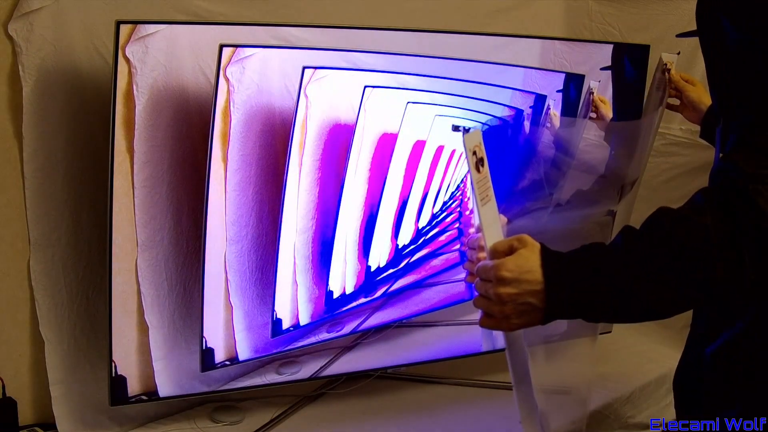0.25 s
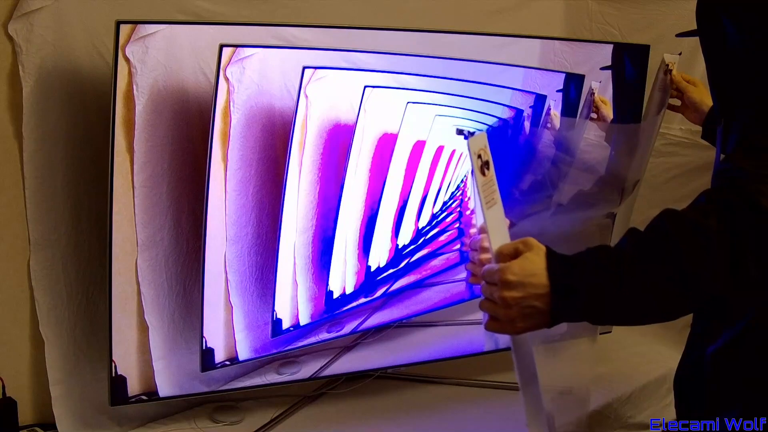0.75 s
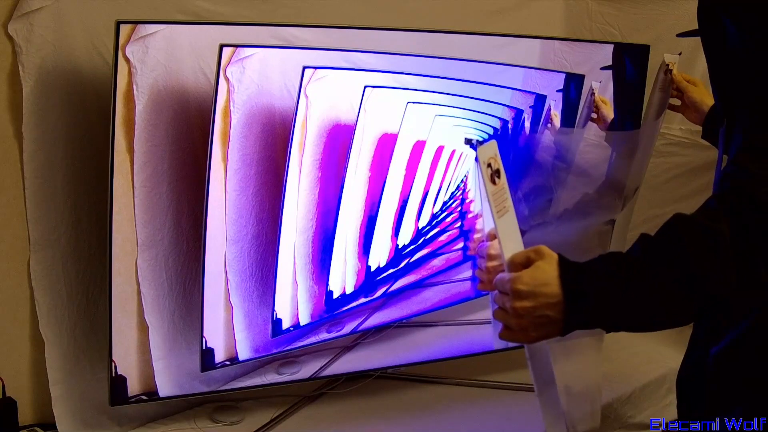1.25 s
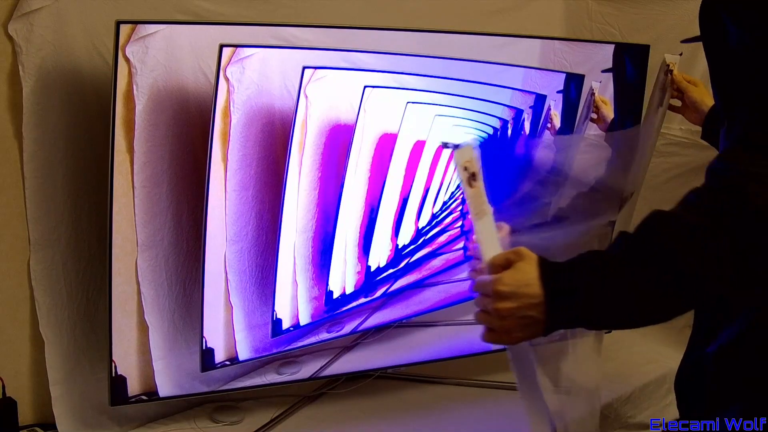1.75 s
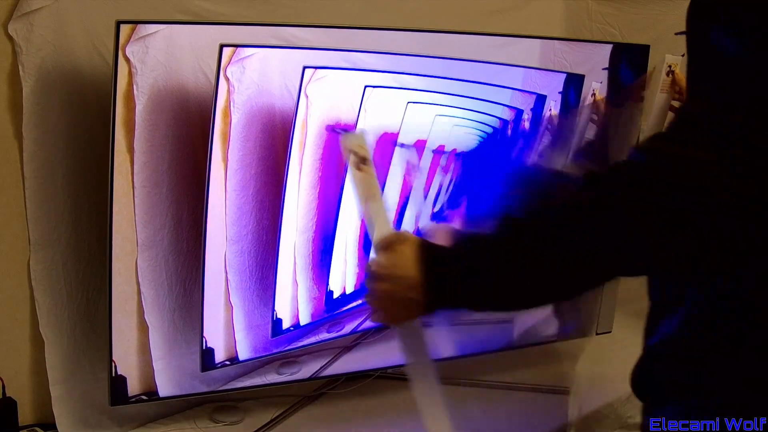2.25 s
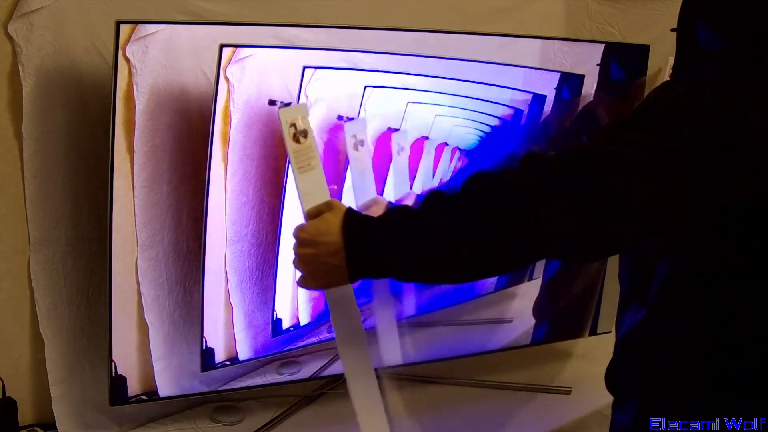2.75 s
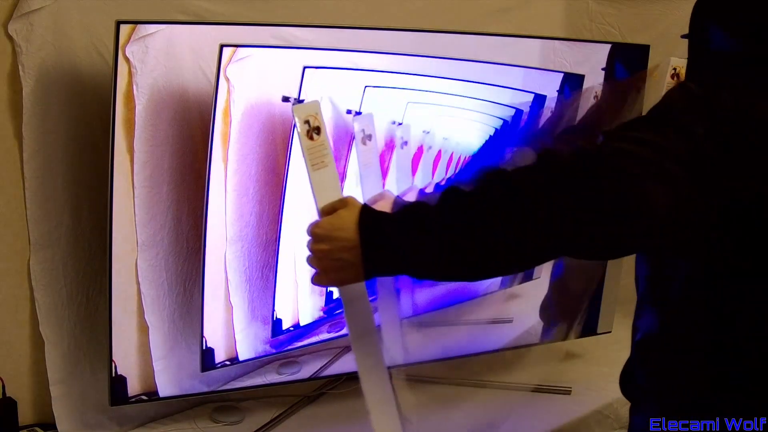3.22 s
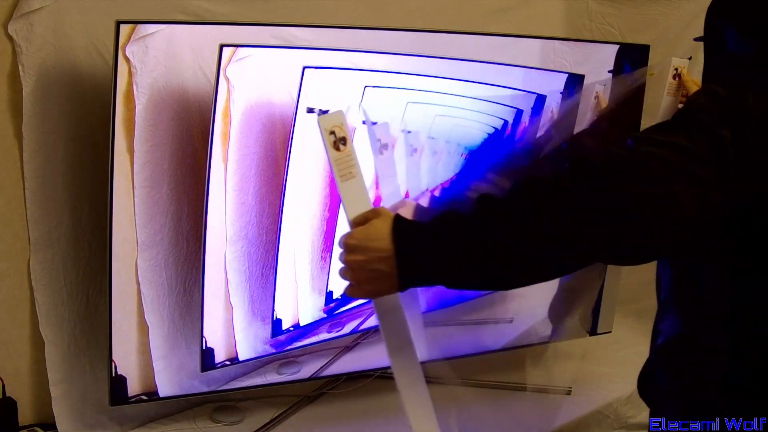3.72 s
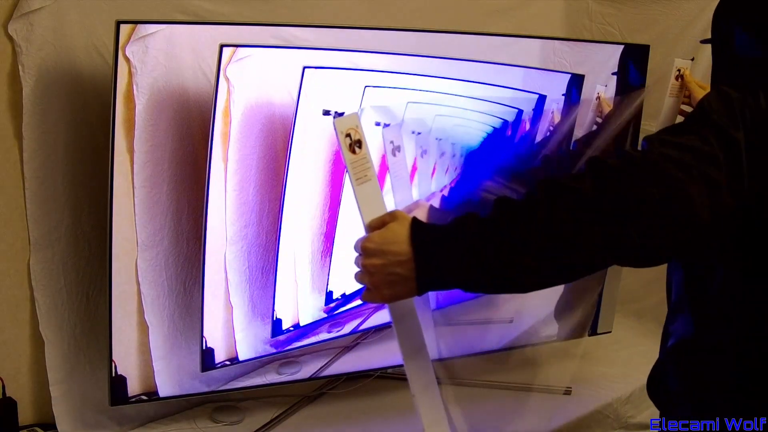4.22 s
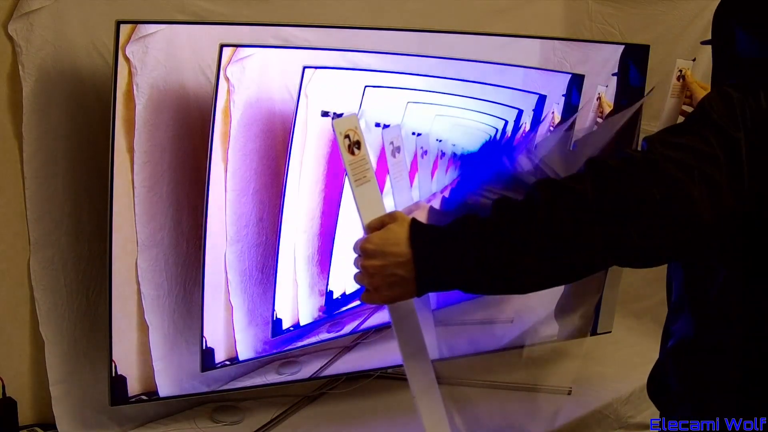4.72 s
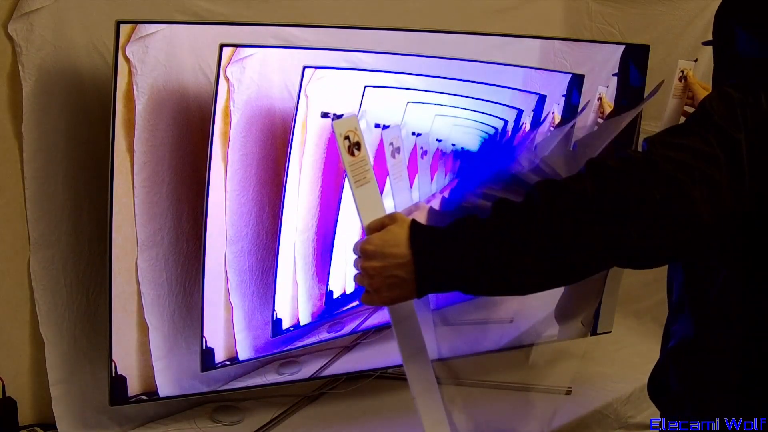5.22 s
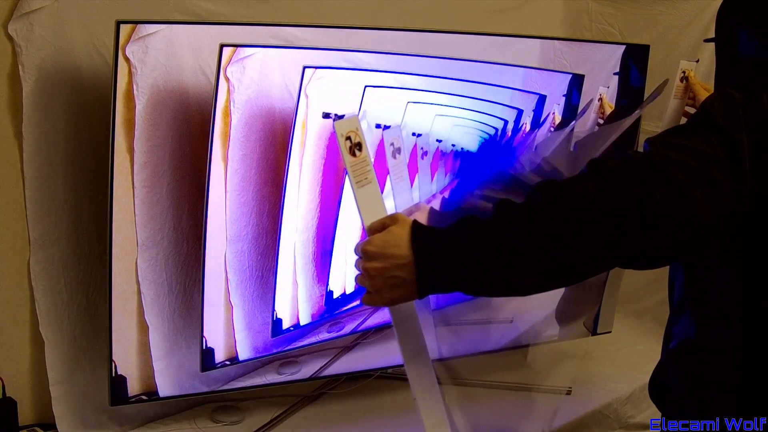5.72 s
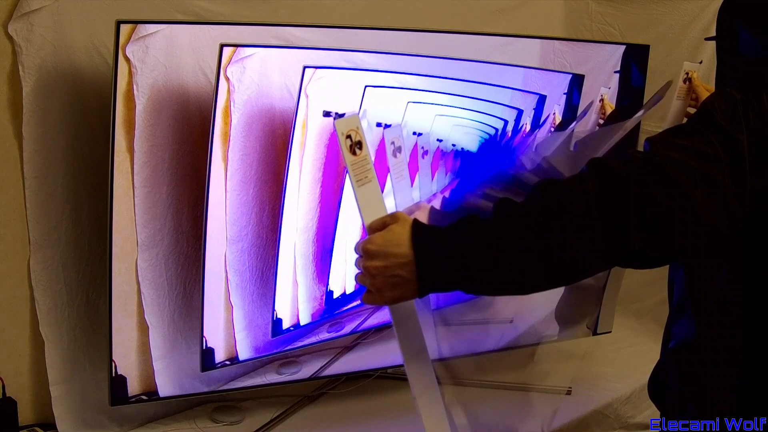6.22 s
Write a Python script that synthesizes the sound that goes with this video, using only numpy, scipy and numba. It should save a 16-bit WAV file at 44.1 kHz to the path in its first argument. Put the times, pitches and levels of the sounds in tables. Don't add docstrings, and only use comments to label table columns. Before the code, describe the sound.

Close recording in a small furnished room. Thin plastic film on a large screen gives a few faint ticks and crisp single snaps, then a hard crack starts a dense rustling, crackling peel with quick rows of clicks and low knocks of the stand. It eases into isolated sharp cracks. Quiet fan noise and mains hum jump up with each snap and slide back down.

```python
import sys
import numpy as np
from scipy import signal
from scipy.fft import rfft, irfft
from scipy.io import wavfile
from scipy.ndimage import uniform_filter1d
from numba import njit

SR = 44100
rng = np.random.default_rng(int(sys.argv[2]) if len(sys.argv) > 2 else 0)


def to_wav(sig):
    pcm = np.clip(np.atleast_2d(sig), -1, 1) * 32767
    pcm = np.round(pcm).astype(np.int16)
    wavfile.write(sys.argv[1], SR, pcm.T)


def elevation(decibels):
    levels = np.asarray(decibels, float)
    return 10 ** (levels / 20)


N = 285092

# freq_hz, density_db_per_hz
AIR_SPECTRUM = [(41, -39.5), (70, -13.5), (108, -9.5), (177, -7), (239, -2.5), (337, -8.5), (418, -1.5),
                (507, -7.5), (797, -11), (1010, -17.5), (1620, -20), (2190, -23.5), (4650, -32.5),
                (12000, -63), (15600, -80.5), (22000, -120)]
# freq_hz, level_db
HUM_TONES = [(49.8, -77), (100, -80), (246, -83.5), (432, -84.5), (786, -78.5), (4715, -101)]
# band_hz, t60_s
ROOM_T60 = [(200, 0.37), (400, 0.43), (800, 0.32), (1600, 0.23), (3200, 0.21), (6400, 0.15), (12000, 0.2)]
# start_s, peak_db, ring_hz, treble_db
TICKS = [
    (0.458, -54, 1240, -22),
    (0.5008, -53.5, 1470, -23),
    (0.7732, -53.5, 2060, 9),
    (1.2595, -53, 1580, -32),
    (1.5638, -57.5, 1198, -25),
    (5.6504, -66, 1450, 5.5),
    (5.6564, -70, 1420, 8),
]
# start_s, peak_db, ring_hz, bright_click_db, slackness_db
LONE_CREASES = [(0.6323, -30, 1010, -60, 2.5), (0.8025, -21, 1480, -29, 2), (1.0207, -28, 800, -52, -6),
                (1.06, -36.5, 1510, -65, -12), (1.6363, -28, 1447, -53, 1), (1.6784, -4.5, 1860, -14.5, -1),
                (1.6951, -19.5, 1680, -18, 5.5), (1.7077, -13, 970, -19, 3.5), (1.7644, -24, 2970, -61, -6),
                (1.7724, -25, 880, -49, 6.5), (4.359, -20.5, 1635, -46.5, 0.5),
                (4.5176, -29.5, 1687, -32, -4), (4.554, -2, 1704, -13, -2.5),
                (4.5614, -11, 1600, -35.5, -6), (4.5844, -24, 2260, -54.5, -13.5),
                (5.0522, -15.5, 1380, -22, -20), (5.0586, -21.5, 3550, -20, -2.5),
                (5.0677, -24.5, 3420, -43, -4), (5.0913, -24.5, 1370, -27.5, -20),
                (5.1027, -27, 3000, -37.5, -7.5), (5.7508, -29, 1520, -39, -6.5),
                (6.1714, -32.5, 1440, -30, -7.5), (6.1811, -22, 1460, -19, -3.5),
                (6.2418, -33.5, 1306, -33, -19.5)]
# start_s, peak_db, ring_hz, bright_click_db
PULLED_CREASES = [(1.906, -14, 1040, -25), (2.107, -28.5, 1190, -45), (2.2137, -22.5, 1370, -48),
                  (2.2686, -33, 940, -59.5), (2.3561, -24, 1190, -41), (2.534, -19, 980, -50),
                  (2.6516, -17, 840, -47), (2.7185, -37, 1260, -36), (2.827, -19.5, 1840, -54),
                  (2.8677, -14.5, 1520, -23), (2.8894, -21, 2160, -48), (2.9099, -8.5, 1660, -15),
                  (3.0116, -7, 1670, -16), (3.021, -11, 2480, -22.5), (3.127, -11.5, 2880, -33.5),
                  (3.1358, -14.5, 1620, -47), (3.1681, -14.5, 1170, -56), (3.2056, -20.5, 1900, -29),
                  (3.2344, -17.5, 2170, -27), (3.3262, -11.5, 1850, -33.5), (3.484, -15.5, 1320, -57),
                  (3.6262, -29, 2040, -52), (3.6603, -24, 1490, -55), (3.735, -22.5, 1320, -56),
                  (3.8998, -25.5, 1140, -43), (3.915, -13, 2150, -30), (4.0007, -21.5, 1130, -34.5),
                  (4.1252, -19.5, 1400, -55), (4.1975, -32, 1890, -43)]
# crease_column_index, low_hz, high_hz, level_re_column_db, decay_s
SETTLING = [
    (1, 730, 2400, -26, 0.015),
    (3, 2000, 7000, -25, 0.017),
]
# start_s, peak_db, length_ms, top_edge_db
ZIPS = [(0.84, -26.5, 12, -9), (1.7074, -16, 30, -24), (2.13, -39, 1, -37), (2.289, -31.5, 1, -32),
        (2.485, -23.5, 14, -22), (2.7163, -20.5, 16, -23), (3.1174, -35, 1, -30), (3.2467, -30.5, 12, -23),
        (3.344, -29, 11, -24), (3.4947, -22, 16, -19), (3.5782, -29.5, 16, -18), (3.707, -45, 1, -35),
        (3.762, -43, 1, -17), (3.784, -31, 1, -37), (4.0527, -36, 1, -33), (5.755, -34.5, 1, -10),
        (6.1744, -27, 6, -18), (6.1894, -25, 1, -21.5)]
# time_s, pull_db, tautness_db
PEEL_FRONT = [(1.76, -30, 17), (1.82, -36, -8), (1.89, -43, 0), (2.01, -35, -5), (2.18, -34.5, -1.5),
              (2.5, -35, 12.5), (2.68, -36.5, 2), (2.82, -42, 1), (2.9, -36, 10.5), (3.06, -40.5, 23),
              (3.11, -38.5, 19), (3.35, -39.5, 5), (3.6, -36.5, 2), (3.74, -34.5, 3), (3.83, -40.5, 5),
              (4.06, -40, 6), (4.21, -42.5, -17), (4.42, -44.5, 10)]
# freq_hz, width_hz, level_db
SHEET_MODES = [(333, 220, -4), (607, 95, 0), (713, 130, 2.5), (990, 1800, -4.5)]
# crest_s, level_db, length_ms
RUSHES = [(2.059, -35, 58), (2.11, -35.5, 44), (2.277, -36.5, 33), (2.48, -35, 41), (2.542, -37.5, 42),
          (2.585, -30.5, 32), (2.656, -37.5, 25), (2.961, -32.5, 22), (3.138, -26.5, 33), (3.221, -32, 62),
          (3.64, -51, 27), (3.701, -37, 29), (3.75, -43, 110), (4.212, -40, 44)]
RUSH_BAND_HZ = 810, 2593
# start_s, boom_db, boom_hz, t60_s, knock_db
THUDS = [
    (2.108, -40.5, 38.34, 0.5, -31),
    (2.2, -47, 52.3, 0.33, -44),
    (3.278, -51, 75, .3, -49.5),
    (3.779, -56, 78.6, 0.14, -45),
]

AIR_DB, ROOM_DB = -64, -8.5
GATE_DB, OPEN_DB, KNEE_DB, SHUT_S = 19.5, -41.5, 5, 0.13
BURST_MS, BURST_SPREAD, CLICK_LEAD_S = 7.87, 0.16, 0.0013
BODY_DB, BODY_SLOPE = -14.5, 0.67
TREBLE_DB, LONE_EDGE_DB, PULLED_EDGE_DB = -12.5, -15.5, -35
WRINKLE_HZ, WRINKLE_SPREAD, WRINKLE_MS = 4430, 0.1272, 2.76
ZIP_GAP_MS, ZIP_FADE_DB, ZIP_SCATTER_DB = 6.3, 0.5, 4.5
CRINKLE_DB, FINE_DB = -6, -25
CRINKLE_TAUT = 0.52
PRICKLE_PER_S, PRICKLE_DB = 90, -11.5


def soft(x, hz):
    return signal.sosfilt(signal.butter(2, hz, fs=SR, output="sos"), x)


def band(x, hz, width_hz):
    r = np.exp(-np.pi * width_hz / SR)
    angle = 2 * np.pi * min(hz, 0.4 * SR) / SR
    return signal.lfilter([1, -1], [1, -2 * r * np.cos(angle), r * r], x)


def passband(x, lo_hz, hi_hz):
    edges_hz = [lo_hz, min(hi_hz, 0.45 * SR)]
    return signal.sosfilt(signal.butter(2, edges_hz, "band", fs=SR, output="sos"), x)


def unit(x):
    return x / np.sqrt(np.mean(x ** 2))


def peak(x, db):
    return x * elevation(db) / np.max(np.abs(x))


def add(out, start_s, x):
    i = int(start_s * SR)
    out[i:i + len(x)] += x[:len(out) - i]


def grains(rate_per_s, spread_db):
    hit, size, sign = rng.random((3, N))
    height = elevation(-spread_db * np.log(size + 1e-4))
    return unit((hit < rate_per_s / SR) * np.sign(sign - 0.5) * height)


def air():
    hz, db = np.transpose(AIR_SPECTRUM)
    f = np.maximum(np.arange(N // 2 + 1) * SR / N, 1)
    shape = elevation(np.interp(np.log(f), np.log(hz), db))
    noise = unit(irfft(rfft(rng.standard_normal(N)) * shape, N))
    t = np.arange(N) / SR
    wander = np.cumsum(rng.standard_normal((len(HUM_TONES), N)), axis=1)
    phase = wander * 0.004 * np.sqrt(np.array(HUM_TONES)[:, :1] / 50)
    hum = sum(elevation(d) * np.sqrt(2) * np.sin(2 * np.pi * h * t + p) for (h, d), p in zip(HUM_TONES, phase))
    return (noise * elevation(AIR_DB - 0.5) + hum) * elevation(GATE_DB)


def room(x):
    t = np.arange(SR // 2) / SR
    tail = np.zeros(len(t))
    for noise, (hz, t60_s) in zip(rng.standard_normal((len(ROOM_T60), len(t))), ROOM_T60):
        tail += passband(noise, hz / 1.272, hz * 1.506) * 1000. ** (-t / t60_s)
    tail *= 1 - np.exp(-t / 0.0039)
    return x + elevation(ROOM_DB) * signal.fftconvolve(x, tail / np.sqrt(np.sum(tail ** 2)))[:N]


def volley(chance, rise_ms, length_ms):
    t_ms = np.arange(chance.shape[1]) / SR * 1000
    slips = (chance[0] < 0.15) * (chance[1] - 0.5) + 0.16 * (chance[2] - 0.5)
    slips[int(1.5 * rise_ms * SR / 1000)] = 0.79
    return slips * (1 - np.exp(-t_ms / rise_ms)) * np.exp(-(t_ms / max(length_ms, 0.5)) ** 1.8)


def snap(db, hz, treble_db, body_db, length_ms, chance):
    ring = band(volley(chance, 1.0, length_ms), hz, 0.38 * hz)
    ring = soft(band(ring, 0.6 * hz, 3.35 * hz), 2.52 * hz)
    ring = soft(ring, 5100)
    treble = soft(passband(volley(chance, 0.46, 0.34 * length_ms), 3300, 5100), 12000)
    body = soft(passband(volley(chance, 2.6, 1.4 * length_ms), 362, 1000), 1716)
    return peak(ring, db - 2.5) + peak(treble, db + treble_db - 11.5) + peak(body, db + body_db + 0.55)


def ticks():
    out = np.zeros(N)
    for (s, db, hz, treble_db), chance in zip(TICKS, rng.random((len(TICKS), 3, 2048))):
        add(out, s - 0.001, snap(db + GATE_DB - 0.5, hz, treble_db, -19, 12.0, chance))
    return out


def wrinkle(db, hz, edge_db, length_ms, chance):
    click = passband(volley(chance, 0.4, length_ms), 0.27 * hz, 1.297 * hz)
    click = soft(soft(click, 9800), 9800)
    edge = soft(passband(volley(chance[::-1], 0.2, 0.86 * length_ms), 7500, 15000), 14000)
    return peak(click, db + 1.5) + peak(edge, db + edge_db - 2.0)


def fold(db, edge_db, chance):
    hz = WRINKLE_HZ * (1 + WRINKLE_SPREAD * (2 * chance[2, -1] - 1))
    return wrinkle(db, hz, edge_db, WRINKLE_MS, chance)


def creases(table, edge_db):
    out = np.zeros(N)
    for (s, db, hz, bright_db, *slack_db), chance in zip(table, rng.random((len(table), 6, 1200))):
        length_ms = BURST_MS * (1 + BURST_SPREAD * (2 * chance[5, -1] - 1))
        body_db = BODY_DB + (BODY_SLOPE - 1) * db + sum(slack_db)
        add(out, s - 0.001, snap(db, hz, bright_db + TREBLE_DB - db, body_db, length_ms, chance[:3]))
        add(out, s - CLICK_LEAD_S, fold(bright_db, edge_db, chance[3:, :800]))
    return out


def settling():
    rows = np.array([row[:4] for row in (*LONE_CREASES, *PULLED_CREASES)])
    out = np.zeros(N)
    for column, lo_hz, hi_hz, db, decay_s in SETTLING:
        kick = np.zeros(N)
        kick[(rows[:, 0] * SR).astype(int) + 88] = elevation(rows[:, int(column)] + db)
        fade = signal.lfilter([1], [1, -np.exp(-1 / (decay_s * SR))], kick)
        crackle = passband(grains(5000, 2.5), lo_hz, hi_hz)
        out += fade * unit(soft(soft(crackle, 1.5 * hi_hz), 1.6 * hi_hz))
    return out


def zips():
    out = np.zeros(N)
    for (s, db, length_ms, edge_db), row in zip(ZIPS, rng.random((len(ZIPS), 5, 3, 800))):
        clicks = 1 + int(length_ms / ZIP_GAP_MS + 0.5)
        for k, chance in enumerate(row[:clicks]):
            late_s = k * ZIP_GAP_MS / 1000 * (0.7 + 0.45 * chance[0, -1])
            click_db = db - k * ZIP_FADE_DB - ZIP_SCATTER_DB * chance[1, -1]
            add(out, s + late_s - 0.0005, fold(click_db, edge_db, chance))
    return out


def snaps():
    loud = creases(LONE_CREASES, LONE_EDGE_DB) + creases(PULLED_CREASES, PULLED_EDGE_DB)
    return ticks() + loud + zips()


def peel_gains():
    s, pull_db, taut_db = np.transpose(PEEL_FRONT)
    t = np.arange(N) / SR
    edge = np.clip(np.minimum(t - s[0], s[-1] - t) / 0.03, 0, 1)
    layers_db = pull_db, pull_db + CRINKLE_DB + CRINKLE_TAUT * taut_db, pull_db + FINE_DB + taut_db
    return [edge * elevation(np.interp(t, s, db)) for db in layers_db]


def clumps(rate_per_s, spread_db):
    k = int(SR / rate_per_s)
    steps = np.repeat(rng.standard_normal(N // k + 1), k)[:N]
    return elevation(spread_db * unit(uniform_filter1d(steps, size=k)))


def peel():
    rustle, crinkle, fine = peel_gains() * clumps(35, 1.9)
    slips = soft(grains(2400, 2.4), 1000)
    sheet = np.zeros(N)
    for k, (hz, width_hz, db) in enumerate(SHEET_MODES):
        sheet += (-1) ** k * elevation(db) * unit(band(slips, hz, width_hz))
    small = soft(passband(soft(grains(2500, 2.06), 4300), 630, 2000), 4700)
    finest = soft(passband(soft(grains(1200, 4), 6000), 2000, 3500), 5500)
    out = rustle * elevation(-1.0) * unit(soft(sheet, 1600))
    out += crinkle * elevation(-1.0) * unit(small)
    return out + fine * elevation(-13.5) * unit(finest)


def prickle():
    crinkle = peel_gains()[1] * elevation(PRICKLE_DB)
    dull = passband(grains(PRICKLE_PER_S, 2), 1100, 2500)
    dull = unit(soft(soft(dull, 4000), 5000))
    bright = passband(grains(PRICKLE_PER_S, 4.2), 2800, 5500)
    bright = unit(soft(soft(bright, 7000), 8000))
    return crinkle * (dull + elevation(-14) * bright)


def rushes():
    t = np.arange(N) / SR
    swell = sum(elevation(db) * np.exp(-((t - s) / (ms / 2000)) ** 2) for s, db, ms in RUSHES)
    return swell * unit(soft(passband(grains(2600, 1.5), *RUSH_BAND_HZ), 3800))


def thuds():
    out, t = np.zeros(N), np.arange(SR) / SR
    for (s, db, hz, t60_s, knock_db), noise in zip(THUDS, rng.standard_normal((len(THUDS), SR))):
        boom = (1 - np.exp(-t / 0.04)) * 1000. ** (-t / t60_s) * np.sin(2 * np.pi * hz * t)
        knock = soft(passband(noise * t * np.exp(-t / 0.013), 55, 194), 180)
        add(out, s, peak(boom, db) + peak(knock, knock_db))
    return out


def scene():
    front = peel() + rushes() + settling() + prickle()
    return (room(snaps()) + room(front) + thuds() + air())[None]


@njit
def follow(power, attack, release):
    out, e = np.empty(len(power)), power[:2000].mean()
    for i in range(len(power)):
        e += (power[i] - e) * (attack if power[i] > e else release)
        out[i] = e
    return out


@njit
def ramp(target, step):
    out, g = np.empty(len(target)), target[0]
    for i in range(len(target)):
        g = max(target[i], g - step)
        out[i] = g
    return out


def band_limit(x):
    return signal.sosfilt(signal.butter(12, 16530, fs=SR, output="sos"), x)


def record(dry):
    dry = signal.sosfilt(signal.butter(4, 33, "high", fs=SR, output="sos"), soft(dry, 13500))
    heard = passband(dry[0], 544, 9000) ** 2
    level_db = 10 * np.log10(follow(heard, 1 / (0.0061 * SR), 1 / (0.0072 * SR)) + 1e-12)
    shut = 1 - np.clip(1 - (OPEN_DB - level_db) / KNEE_DB, 0, 1) ** 2
    gain = ramp(elevation(-GATE_DB * shut), 1 / (SHUT_S * SR))
    gain = uniform_filter1d(gain, size=96, origin=20)
    hiss = elevation(-95.5) * rng.standard_normal(N)
    return band_limit(dry * gain + hiss)


dry = scene()
out = record(dry)
to_wav(out)
```